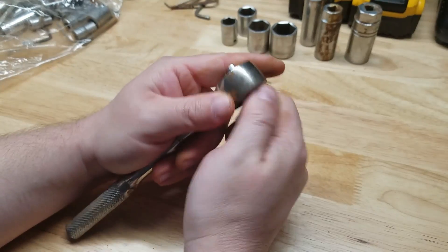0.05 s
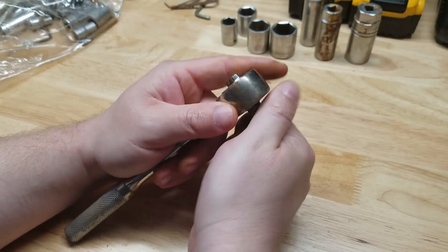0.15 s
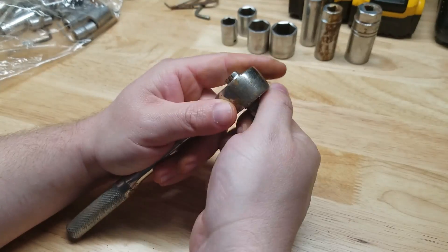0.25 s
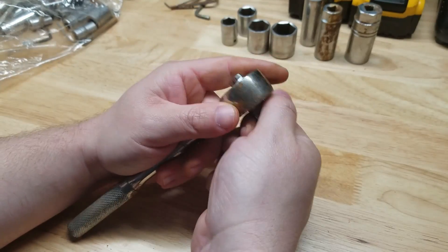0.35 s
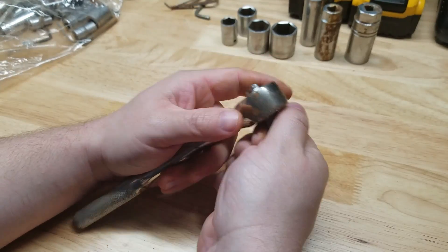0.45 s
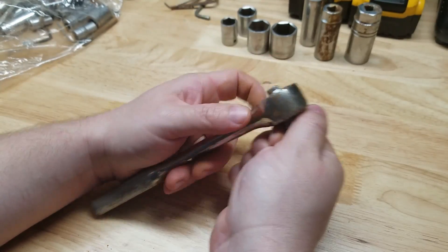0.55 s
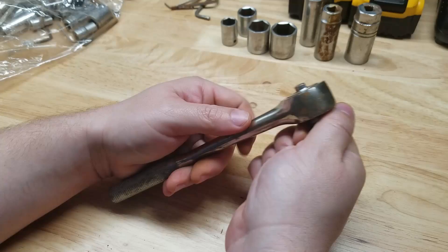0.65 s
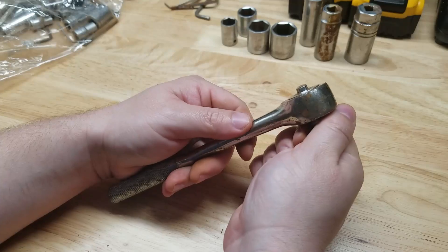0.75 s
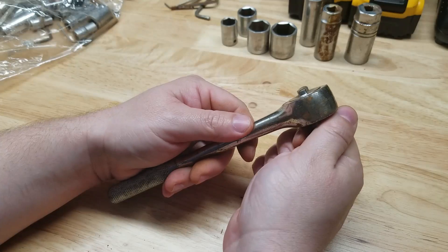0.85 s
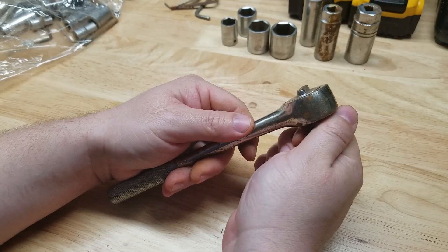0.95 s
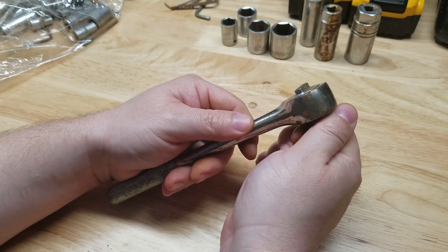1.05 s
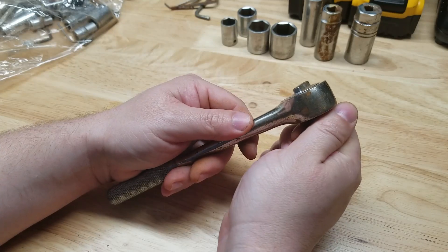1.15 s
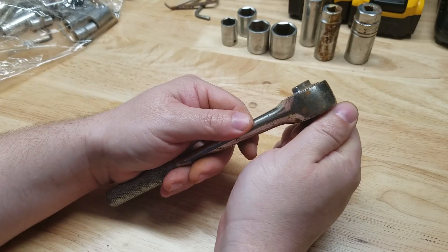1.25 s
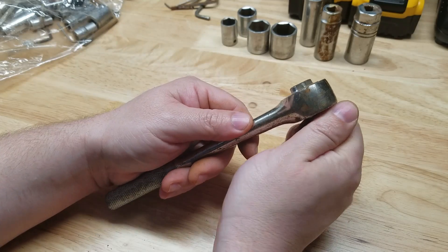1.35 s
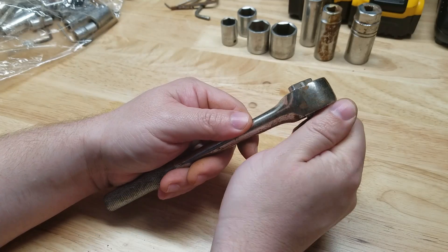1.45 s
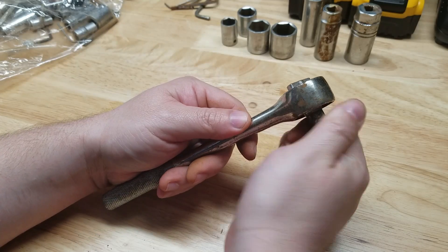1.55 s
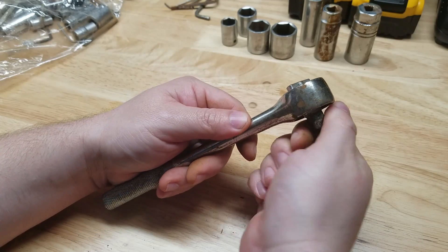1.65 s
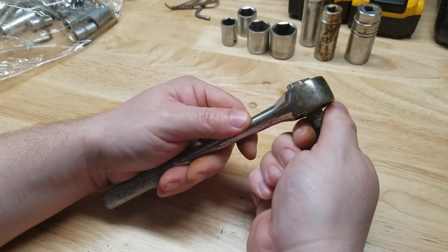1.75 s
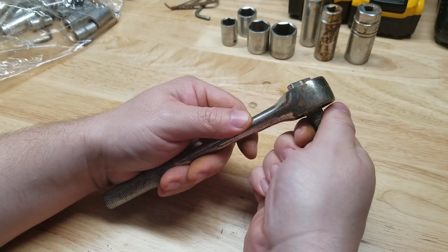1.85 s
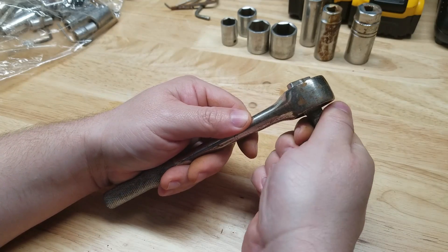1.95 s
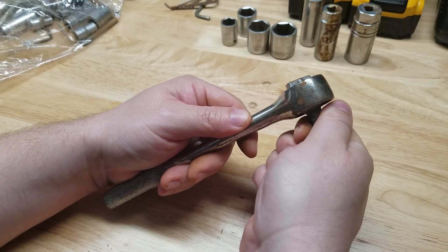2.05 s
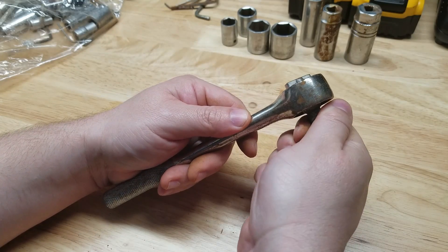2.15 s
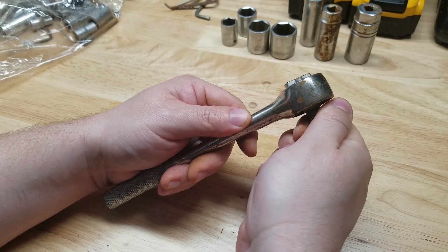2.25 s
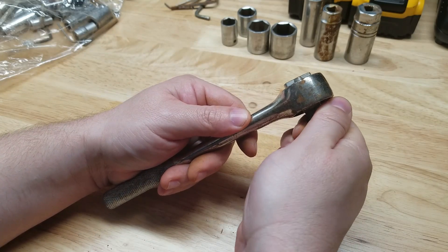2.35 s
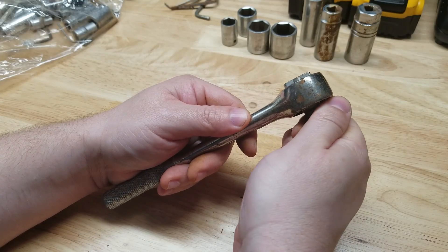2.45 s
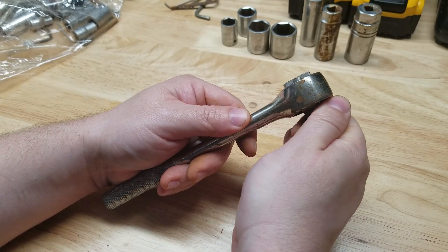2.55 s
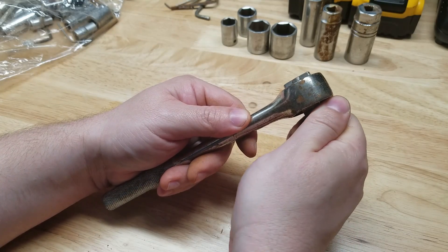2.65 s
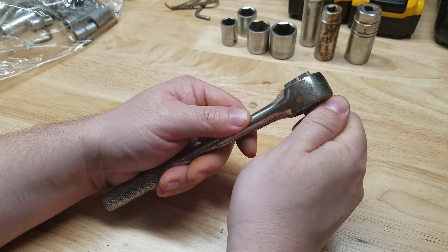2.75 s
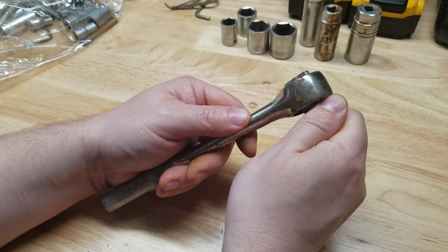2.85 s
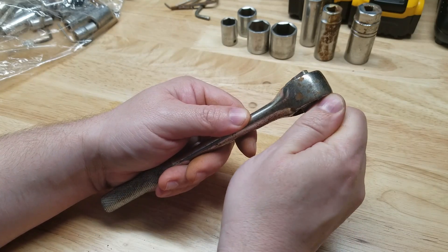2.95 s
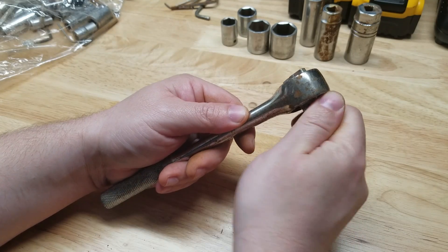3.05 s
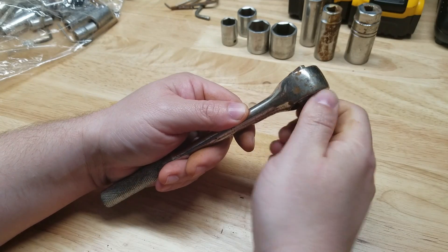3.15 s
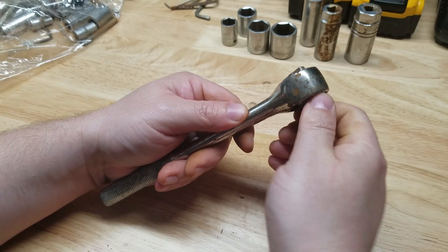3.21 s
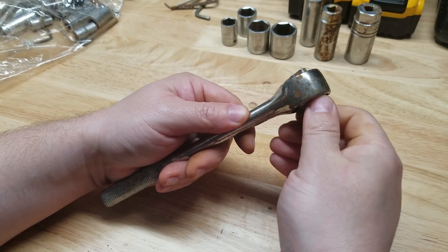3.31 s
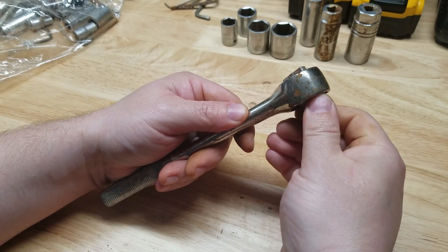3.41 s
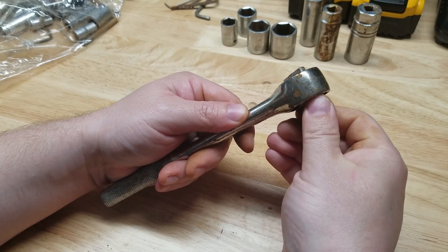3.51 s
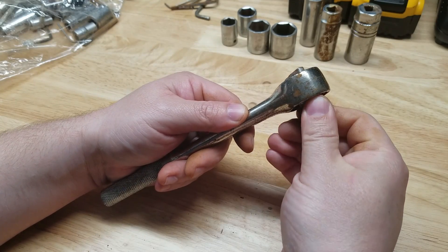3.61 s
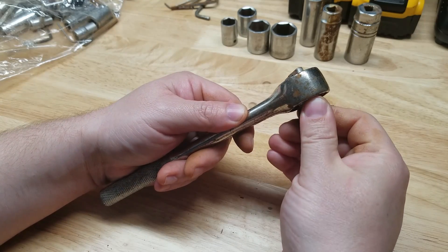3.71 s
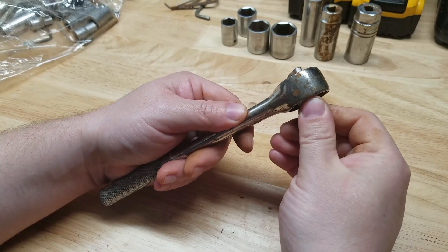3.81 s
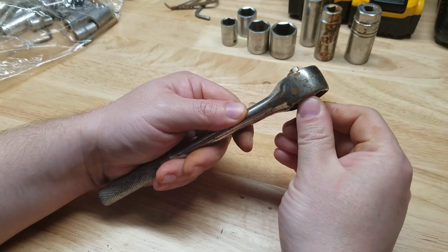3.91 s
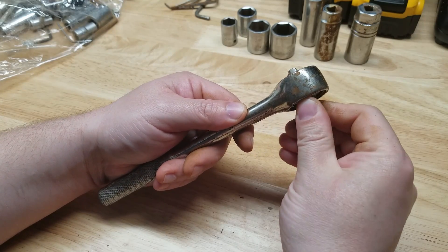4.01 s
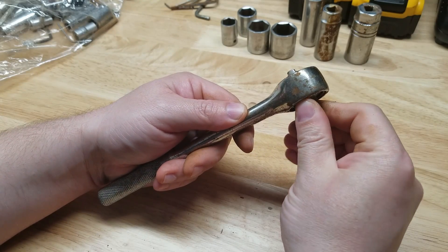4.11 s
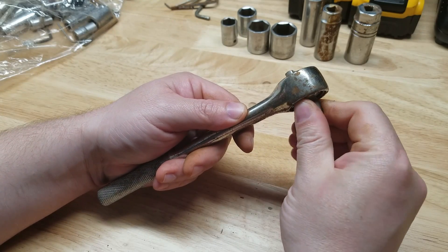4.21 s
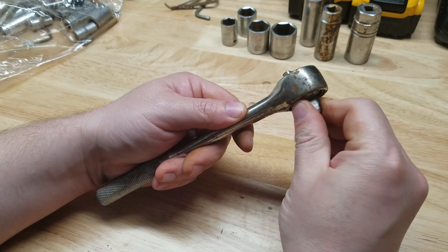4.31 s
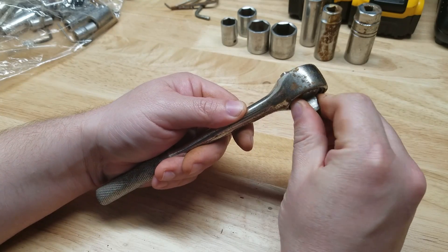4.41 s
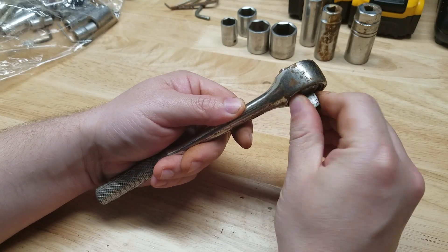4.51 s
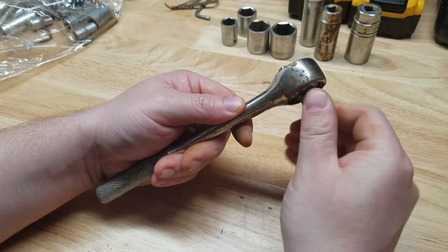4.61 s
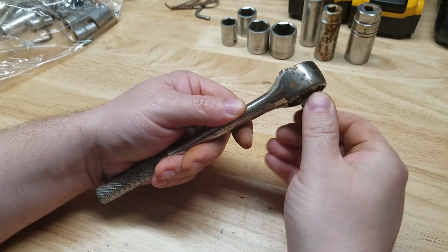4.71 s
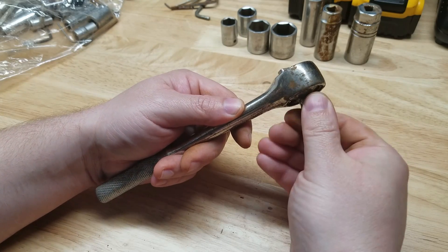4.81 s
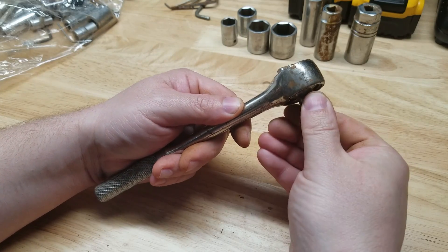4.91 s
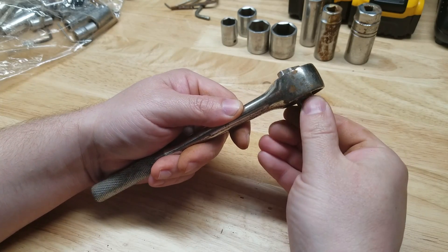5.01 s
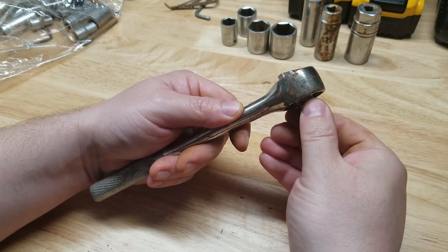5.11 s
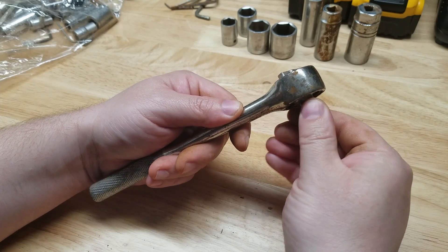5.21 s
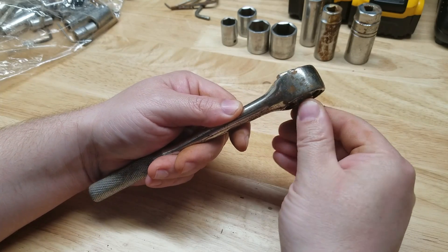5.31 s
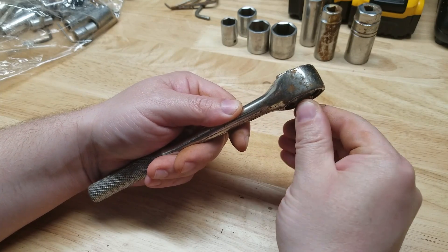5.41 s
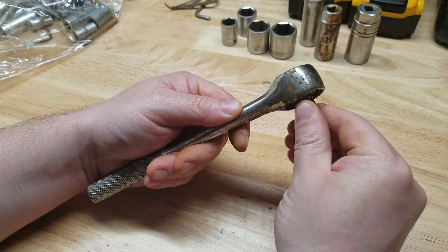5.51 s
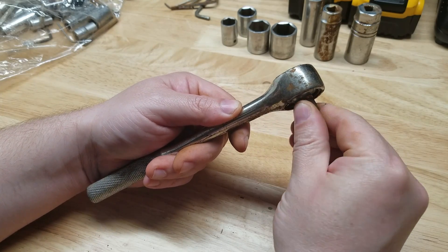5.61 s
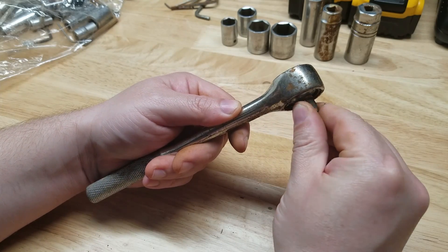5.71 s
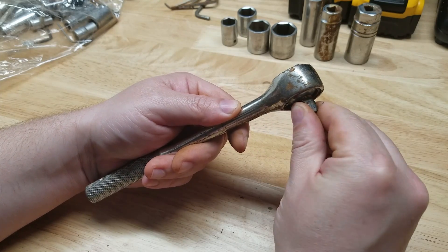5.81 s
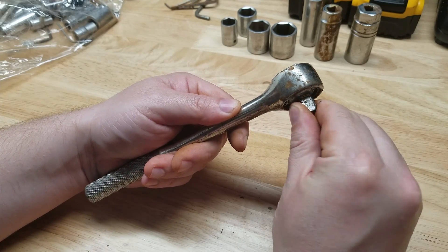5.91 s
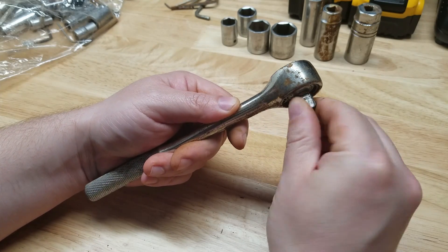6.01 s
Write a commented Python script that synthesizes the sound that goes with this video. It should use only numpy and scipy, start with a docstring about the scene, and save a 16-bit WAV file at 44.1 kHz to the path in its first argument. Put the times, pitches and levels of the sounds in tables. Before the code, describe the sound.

A small indoor workshop, heard close up through a phone, with steady low ventilation rumble and faint hiss throughout. At about 0.1 s the handle strikes the wooden bench: one loud, hollow knock with an almost immediate bounce and short room tail. Around 0.4 to 0.6 s it judders and scrapes briefly over the wood. From 0.55 s the ratchet's pawl clicks tooth by tooth, faint at first, then stronger, about a dozen bright steel ticks until 1.44 s. After a pause, a second run goes from 2.0 to 3.0 s, weakening at its end. A third, from 3.55 to 4.4 s, builds and speeds up to a rapid flurry. Following nearly a second of room noise, a quieter, drier run clicks from 5.26 to 5.93 s. Each click is a tiny sharp snap with a very short, high metallic ring, varying slightly in tone, with a light room reflection.

```python
"""In a small workshop a socket ratchet is turned by hand over a wooden bench, close to a phone.
First the handle knocks on the bench top and slides over it: forces that excite damped bench modes.
Then the pawl drops tooth by tooth, each drop a tick and snap of noise and a ringing of the steel head.
Decaying noise gives the answer of the walls; shaped noise gives the ventilation rumble, the hiss
and a faint airy band."""
import sys
import numpy as np
from scipy import signal
from scipy.fft import rfft, irfft
from scipy.io import wavfile
from scipy.ndimage import uniform_filter1d

SR = 44100
rng = np.random.default_rng(int(sys.argv[2]) if len(sys.argv) > 2 else 0)


def store_wav(level_fs):
    """Save 16-bit WAV to argv[1]."""
    pcm = np.round(np.clip(np.atleast_2d(level_fs), -1, 1) * 32767)
    wavfile.write(sys.argv[1], SR, pcm.T.astype(np.int16))


N = 267246
PORTS = np.array([[.5], [-.5]])  # shares a left minus right difference between the two ports


def amp(db):
    """Level to amplitude: 20 dB is a factor of ten."""
    return 10 ** (np.asarray(db, float) / 20)


def unit(x):
    """Normalisation to an rms of 1."""
    return x / np.sqrt(np.mean(x ** 2))


def fade(t, t60):
    """Exponential decay by viscous damping, 60 dB down after t60."""
    return np.exp(-np.log(1000) * t / t60)


def on_log(table, hz):
    """Linear interpolation of (f/Hz, value) points on a log-frequency axis."""
    f, value = np.transpose(table)
    return np.interp(np.log(np.maximum(hz, 1)), np.log(f), value)


def colour(x, gain):
    """Zero-phase linear filtering: the spectrum is weighted by gain(hz)."""
    n = x.shape[-1]
    hz = np.arange(n // 2 + 1) * SR / n
    return irfft(rfft(x) * gain(hz), n)


def add(out, x, s):
    """Superposition of x on out from time s."""
    i = int(s * SR)
    out[:, i:i + x.shape[1]] += x[:, :N - i]


def walk(rate):
    """Low-passed random process: levels held for 1 / rate s and averaged twice; spread near 1."""
    k = int(SR / rate)
    held = np.repeat(rng.standard_normal(N // k + 1), k)
    return 1.12 * uniform_filter1d(uniform_filter1d(held, k), k)[:N]


def swells(table):
    """Exponential growth and decay: each gain rises to a peak and falls at steady dB rates."""
    t = np.arange(N) / SR
    total = 0
    for s, db, rise, fall in table:
        drop_db = np.where(t < s, rise * (s - t), fall * (t - s))
        total = total + amp(db - drop_db)
    return total


def both(x, pan_db, side):
    """Level and gradient differences between two ports: x with its slope in opposite sense."""
    slope = -np.gradient(x) * side
    return np.array([amp(pan_db / 2) * (x - slope), amp(-pan_db / 2) * (x + slope)])


# spectrum of the air sound in the mid channel: f/Hz, relative level/dB per Hz
AIR_SPECTRUM = [(12, -40.5), (20, -30.5), (53, -4), (82, -23.5), (105, -6), (131, -3), (258, -9),
                (342, -2.5), (382, -10), (506, -7.5), (772, -21), (1600, -29), (2370, -46.5),
                (13900, -52.5), (16500, -58)]
# its stereo width: f/Hz, side minus mid level/dB
AIR_WIDTH = [(60, -10.5), (110, -20), (200, -15), (380, -13), (700, -3), (1290, -2.5), (2380, 4),
             (4400, -1), (8120, 1.5), (15000, 2)]
# room resonances: f/Hz, width/Hz, level/dB before a common factor
AIR_RESONANCES = [(134.8, 7.7, 0), (325, 37, -2.5), (511.4, 16, -3.5)]
AIR_DB = -49.5


def air():
    """Stationary broadband noise: slowly wavering rumble with room resonances, and microphone hiss."""
    def shape(hz):
        bumps = 0
        for f, width, db in AIR_RESONANCES:
            bumps = bumps + amp(db) / (1 + ((hz - f) / width * 2) ** 2)
        return amp(on_log(AIR_SPECTRUM, hz)) * (1 + 1.05 * bumps)
    mid = colour(rng.standard_normal(N), shape)
    side = colour(rng.standard_normal(N), lambda hz: shape(hz) * amp(on_log(AIR_WIDTH, hz)))
    low = colour(mid, lambda hz: 1 / (1 + (hz / 1500) ** 4))
    waver_db = 0.19 * walk(5.8) + 1.3 * walk(14)
    mid = mid + low * (amp(waver_db) - 1)  # only the low part wavers
    return amp(AIR_DB) * np.array([mid + side, mid - side]) / np.sqrt(np.mean(mid ** 2))


# level of a faint airy band that comes and goes: t/s, level/dB
AIRY_LEVEL = [(0.0, -58.5), (0.24, -64), (1.202, -74), (2.0, -96), (2.951, -69), (3.56, -76), (4.3, -73.5),
              (5.1, -96), (6.06, -99)]
AIRY_HZ, AIRY_WIDTH_HZ = 1572, 92  # centre, and distance at which the gain is 1 / e


def airy():
    """Narrow-band noise, uncorrelated at the two ports, with a varying level."""
    band = colour(rng.standard_normal((2, N)), lambda hz: np.exp(-((hz - AIRY_HZ) / AIRY_WIDTH_HZ) ** 2))
    return unit(band) * amp(np.interp(np.arange(N) / SR, *np.transpose(AIRY_LEVEL)))


# modes of the wooden bench top: f/Hz
BENCH_MODES_HZ = [97, 133, 226, 271, 332, 411, 480, 554, 610, 654, 700, 764, 865, 971, 1291, 1420, 1590,
                  1718, 2250, 2370]
# the same modes: relative level/dB, t60/s
BENCH_RESPONSE = [(4, .15), (2, .15), (2, .13), (-3, .1), (6, .07), (-1, .1), (-6, .06), (-4, .14),
                  (-12, .12), (-3, .14), (-9, .06), (-6, .13), (-9, .11), (-21, .13), (-16, .14),
                  (-21, .12), (-21, .14), (-20, .12), (-24, .08), (-22, .08)]


def bench(force):
    """Modal superposition: a force drives the bench modes; the change of their motion is heard."""
    t = np.arange(SR // 2) / SR
    impulse_response = 0
    for hz, (db, t60) in zip(BENCH_MODES_HZ, BENCH_RESPONSE):
        impulse_response = impulse_response + amp(db) * fade(t, t60) * np.sin(2 * np.pi * hz * t)
    motion = signal.fftconvolve(force, impulse_response)[:len(force)]
    return np.gradient(motion)


# swells of the sliding handle, all three: t/s of the peak, level/dB, rise/(dB/s), fall/(dB/s)
JUDDER_SWELLS = [(.41, -45, 899, 699), (.478, -38.5, 900, 295), (.505, -35, 350.5, 904)]
SCRAPE_SWELLS = [(.003, -60, 200, 61), (.543, -33, 440, 400)]
RUSTLE_SWELLS = [(.003, -65.5, 200, 70), (.595, -55, 130, 330)]
JUDDER_HZ = 345  # mean; close to the strongest bench mode


def slide():
    """Friction excitation: the handle judders near a bench mode, scrapes all modes and rustles."""
    judder_hz = JUDDER_HZ * (1 + 0.04 * walk(38.7))
    judder = np.sqrt(2) * np.sin(2 * np.pi * np.cumsum(judder_hz) / SR)
    # a soft contact pushes mainly the low modes
    force = colour(rng.standard_normal(N), lambda hz: 1 / (1 + (hz / 350) ** 2))
    scrape = unit(bench(force)) * amp(2.5 * walk(41))
    grain = colour(rng.standard_normal((2, N)),
                   lambda hz: hz ** 2 / (hz ** 2 + 1200 ** 2) / (1 + (hz / 2500) ** 6))
    wood = swells(JUDDER_SWELLS) * judder + swells(SCRAPE_SWELLS) * scrape
    return both(wood, 2.1, 2.5) + swells(RUSTLE_SWELLS) * unit(grain)


# spectrum of the knock's thud: f/Hz, relative level/dB per Hz
THUD_SPECTRUM = [(60, -49), (350, -3.5), (800, -17.5), (1050, -18), (1500, -12), (2300, -22.5),
                 (3300, -33.5), (4200, -47.5), (6000, -55), (12000, -65)]
KNOCK_S, KNOCK_DB, KNOCK_PUSH_S = .0953, -2, 0.0015  # onset, modal level, length of one push
BOUNCE_S, BOUNCE_DB = .0098, -5  # delay and force relative to the blow
THUD_DB, THUD_T60_S = -17, 0.12


def knock():
    """Impact excitation: a blow and its bounce drive the modes; dense weak modes add a noisy thud."""
    out, t = np.zeros((2, N)), np.arange(SR // 2) / SR
    push = 0
    for s, gain in [(0, 1), (BOUNCE_S, amp(BOUNCE_DB))]:
        push = push + gain * np.sin(np.pi * np.clip((t - s) / KNOCK_PUSH_S, 0, 1)) ** 2
    ring = -bench(push)
    ring = amp(KNOCK_DB) * ring / np.abs(ring).max()
    noise = rng.standard_normal((2, len(t)))
    # the bass is alike at both ports
    noise = noise + colour(noise[:1] - noise, lambda hz: 1 / (1 + (hz / 450) ** 2))
    thud = unit(colour(noise, lambda hz: amp(on_log(THUD_SPECTRUM, hz))))
    thud = thud * np.sin(np.pi / 2 * np.clip(t / 0.0029, 0, 1)) ** 2  # soft onset
    add(out, both(ring, 1.1, 5.1) + amp(THUD_DB) * thud * fade(t, THUD_T60_S), KNOCK_S)
    return out


ROOM_T60_LOW_S, ROOM_T60_HIGH_S, ROOM_GAP_S = 0.35, 0.22, 0.0013


def room(x):
    """Diffuse reverberation: x convolved with decaying noise, bass alike at both ports, treble shorter."""
    t = np.arange(SR // 3) / SR
    noise = rng.standard_normal((2, len(t)))
    noise = noise + colour(noise[:1] - noise, lambda hz: 1 / (1 + (hz / 600) ** 2))
    low = colour(noise, lambda hz: 1 / (1 + (hz / 2500) ** 4))
    tail = low * fade(t, ROOM_T60_LOW_S) + (noise - low) * fade(t, ROOM_T60_HIGH_S)
    tail = tail * np.clip(t / ROOM_GAP_S - .5, 0, 1)  # silent for half the gap, then rising
    return signal.fftconvolve(x, unit(tail) / np.sqrt(len(t)), axes=1)


# sway of each ring family as the gear goes round, a slow and a quick one counted in teeth:
# mean level/dB re the drop, then twice: depth/dB, period/teeth, tooth where it is loudest
FAMILY_SWAY = [(-21.5, 7.7, 79, 23.4, 6.5, 23.2, 1.8), (-19.5, 2.0, 31.0, 21.0, 4.0, 16.5, 2.5),
               (-20, 3.2, 21.7, 13.0, 3.2, 13.2, 2.4), (-17.5, 4.5, 48.6, 47.5, 1.5, 9.6, 2.1),
               (-22.5, 6.5, 31.0, 12.5, 5.0, 15.0, 14.6), (-26.5, 7.0, 27.4, 7.5, 2.4, 9.1, 4.0)]


def sway(tooth):
    """Periodic modulation: level/dB of each ring family when this tooth passes the pawl."""
    mean_db, slow_db, slow, slow_top, quick_db, quick, quick_top = np.transpose(FAMILY_SWAY)
    slow_wave = np.cos(2 * np.pi * (tooth - slow_top) / slow)
    quick_wave = np.cos(2 * np.pi * (tooth - quick_top) / quick)
    return mean_db + slow_db * slow_wave + quick_db * quick_wave


TICK_HZ, TICK_WIDTH_HZ, TICK_S = 2200, 2430, 0.00077  # centre, full width at half gain, decay to 1 / e
RATTLE_DB, RATTLE_S = -15, 0.012  # re the tick, decay to 1 / e
SNAP_S = 0.0015  # decay to 1 / e
TICK_PAN_DB = -4  # left minus right


def contact(t, tick_db, snap_db, tick_noise, snap_noise):
    """Impulsive contact noise: a band-limited tick with a loose rattle, and a broadband snap."""
    mixed = tick_noise + 0.71 * tick_noise[::-1]  # partly alike at the two ports
    tick = unit(colour(mixed, lambda hz: 1 / (1 + ((hz - TICK_HZ) / TICK_WIDTH_HZ * 2) ** 4)))
    decay = np.exp(-t / TICK_S) + amp(RATTLE_DB) * np.exp(-t / RATTLE_S)
    snap = snap_noise * np.exp(-t / SNAP_S)
    return amp(tick_db + PORTS * TICK_PAN_DB) * tick * decay + amp(snap_db + PORTS * TICK_PAN_DB / 2) * snap


# modes of the steel head, per ring family: list of f/Hz, left minus right level/dB it adds,
# phase/rad by which the left leads besides the path difference
HEAD_FAMILIES = [([3740, 3860], -1, .6), ([7432, 7650], 5.5, 0), ([9050, 8800, 9600], 6.5, 0),
                 ([11200, 11600, 10350, 12650], 4, 0), ([13560, 13850], -1, 0), ([14830, 14480, 15200],
                 3, 0)]
# the same modes: mean level/dB, typical t60/s
HEAD_RESPONSE = [
    [(7, 0.021), (3.5, 0.026)],
    [(7.5, 0.025), (1, 0.021)],
    [(4.5, 0.025), (-42, .03), (-1.5, 0.024)],
    [(2.5, 0.024), (5.5, 0.013), (-18, 0.018), (-8.5, .015)],
    [(-6.5, 0.032), (-8, .025)],
    [(0.5, 0.013), (-1, 0.017), (4, 0.013)],
]
# many weak, quickly damped modes around each family: spread/Hz, level/dB, t60/s
HEAD_SPRAY = [(328, -0.5, 0.031), (700, -2, 0.019), (560, -3.5, 0.0077), (900, -2, 0.02), (700, 3.5, 0.016),
              (611, 7.5, .02)]
# path difference from the head: t/s, lead of the left port/s
PORT_LEAD = [(.5, 45e-6), (3, 70e-6), (6, 105e-6)]
BLOOM_CYCLES = 4.87  # cycles a family takes to ring up


def head(t, s, family_db, noise):
    """Modal ringing of steel: families of damped sines ring up, each amid a band of weak modes."""
    heard = t + PORTS * np.interp(s, *np.transpose(PORT_LEAD))
    total = 0
    for db, (modes_hz, side_db, lead), ring, spray_set in zip(
            family_db, HEAD_FAMILIES, HEAD_RESPONSE, HEAD_SPRAY):
        spread_hz, spray_db, spray_t60 = spray_set
        spray = unit(colour(noise, lambda hz: np.exp(-((hz - modes_hz[0]) / spread_hz) ** 2)))
        family = amp(spray_db) * spray * fade(t, spray_t60)
        for hz, (mode_db, t60) in zip(modes_hz, ring):
            z = rng.standard_normal(5)  # no two drops ring a mode quite alike
            phase = 2 * np.pi * hz * (1 + 0.0043 * z[0]) * heard + 2 * z[1]
            phase = phase + PORTS * (lead + .5 * z[2])
            decay = fade(t, t60 * amp(0.66 * z[4]))
            family = family + amp(mode_db + 0.31 * z[3]) * decay * np.sin(phase)
        bloom = 1 - np.exp(-(t * modes_hz[0] / BLOOM_CYCLES) ** 2)
        total = total + amp(db + PORTS * side_db) * bloom * family
    return total


# pawl drops, one per tooth: t/s, reference level/dB, dull tick level/dB re it, snap level/dB re it,
# left minus right level/dB
PAWL_DROPS = [(0.5528, -44, -14, -1, 3), (0.6148, -30.5, -17, -6.5, 4), (0.675, -33, -11.0, -5.5, 0.5),
              (0.756, -28, -19, -9, 1.0), (0.8501, -24.5, -24.5, -11, -1), (0.9328, -20, -37, -16.5, 1.5),
              (1.023, -18, -48, -19.5, 0.5), (1.1232, -18, -45, -18.5, 1), (1.2204, -14.5, -41.5, -22, 1),
              (1.3171, -20, -31, -15.0, 7), (1.3828, -16.5, -26.5, -15, 4),
              (1.4373, -13.5, -21.5, -16.5, -0.5), (2.0152, -23, -98, -11, 6.5),
              (2.1362, -18, -32, -16.5, 5), (2.243, -20, -33, -14.5, 4), (2.3057, -19.5, -24.5, -16.5, 2.3),
              (2.3819, -17.5, -26.5, -16, 1), (2.4557, -16, -31, -20.5, 1.5),
              (2.5225, -16.5, -32, -20, 1.5), (2.6341, -16.5, -30, -19.5, 4.1),
              (2.6829, -20, -24, -14.5, 4.5), (2.7475, -22, -26, -16.0, 6.5),
              (2.8078, -21.5, -31, -12, 4.5), (2.8607, -24.5, -19, -11.5, 7),
              (2.9136, -25.5, -17.5, -14.5, 4), (2.9775, -25.5, -15, -14.5, 2.5),
              (3.5515, -28, -17, -16.5, 2.5), (3.6181, -23, -19, -11, 4), (3.75, -23.0, -23, -12.5, 1.5),
              (3.8179, -20.5, -24, -16, -1), (3.878, -19.5, -28, -12, 1),
              (3.9204, -18.5, -23.5, -12.5, 3.5), (3.9812, -18.0, -24, -12.5, 2.5),
              (4.0463, -17.0, -26.5, -15.5, 2), (4.1138, -16.5, -35.5, -15, 3.5),
              (4.1654, -14.5, -34, -16.5, 4.5), (4.2242, -15, -33, -21.5, 1),
              (4.2805, -15, -27, -20.5, 3.5), (4.3311, -15, -37, -19.0, 4.5),
              (4.3602, -16.5, -59, -11.0, 6), (4.3839, -17.5, -53, -12.0, 0),
              (4.4043, -16.5, -25, -12.5, 2.5), (5.2625, -30, -41, -10, 4), (5.2902, -23.5, -22, -13.5, 4),
              (5.3198, -24.5, -20, -10, 2.5), (5.3706, -22.5, -20.5, -9.5, 2.5),
              (5.4291, -21.5, -22, -11, -0.5), (5.4695, -21, -23, -10, 0.5), (5.5305, -20.5, -47, -20, 3.5),
              (5.5873, -21.5, -50, -16, -0.5), (5.6901, -24.5, -49, -15, 2.5),
              (5.7642, -23.5, -23.5, -11.0, 2), (5.8234, -24.5, -22, -8.5, 2), (5.8849, -24.5, -17, -10, 0),
              (5.931, -25.5, -19, -4.5, 2.5)]
SCATTER_DB = 0.48  # chance spread of a family's level from tooth to tooth
SPILL_DB = 1.5  # level of the extra tick and snap that reach the walls
CLICK_ROOM_DB = -13.5


def ratchet():
    """Repeated impact excitation: each drop of the pawl makes contact noise and rings the head."""
    out, t = np.zeros((2, N)), np.arange(SR // 12) / SR
    rise = 1 - np.exp(-(t / 0.00022) ** 2)  # the pawl seats over a fraction of a millisecond
    for tooth, (s, level_db, tick_db, snap_db, pan_db) in enumerate(PAWL_DROPS):
        family_db = sway(tooth) + SCATTER_DB * rng.standard_normal(len(FAMILY_SWAY))
        noise = rng.standard_normal((3, 2, len(t)))
        dull = contact(t, tick_db, snap_db, noise[0], noise[1])
        click = dull + head(t, s, family_db, noise[2])
        gain = rise * amp(level_db + PORTS * pan_db)
        add(out, gain * click, s)
        # tick and snap spread in all directions, the rings are beamed
        to_walls = gain * (click + amp(SPILL_DB) * dull)
        # the hands move, so the walls never answer twice alike
        add(out, amp(CLICK_ROOM_DB) * room(to_walls), s)
    return out


KNOCK_ROOM_DB = -7.5


def scene():
    """Linear superposition of air, bench and ratchet, with the room's answer."""
    background = air() + airy()
    wood = slide() + knock()
    return background + wood + amp(KNOCK_ROOM_DB) * room(wood)[:, :N] + ratchet()


TOP_HZ = 16300


def record(dry):
    """Band limiting: the phone thins the deep bass, softens the last treble and cuts the top."""
    dry = signal.sosfilt(signal.butter(3, 50, "high", fs=SR, output="sos"), dry)
    dry = colour(dry, lambda hz: amp(-7 * np.clip((hz - 15300) / 600, 0, 1)))
    return signal.sosfilt(signal.ellip(8, .2, 70, TOP_HZ, fs=SR, output="sos"), dry)


dry = scene()
out = record(dry)
store_wav(out)
```